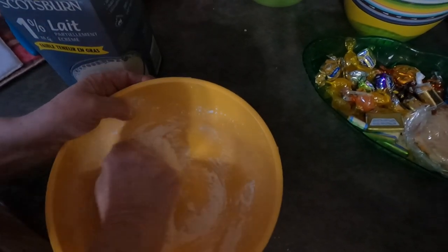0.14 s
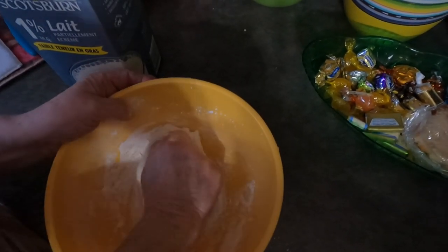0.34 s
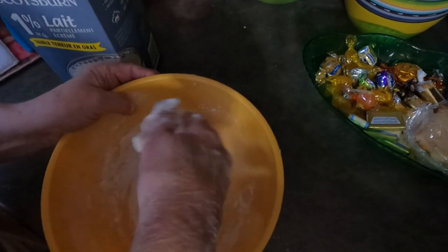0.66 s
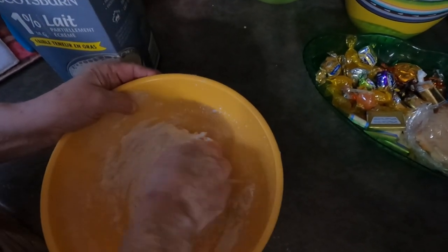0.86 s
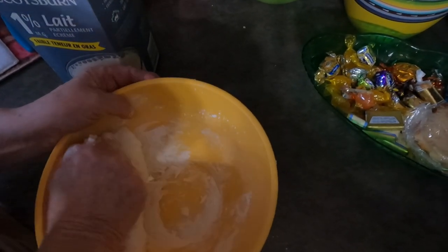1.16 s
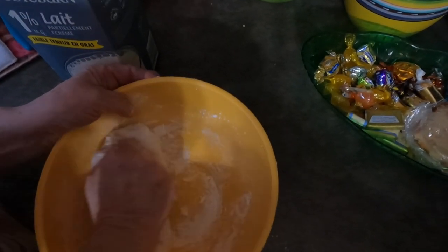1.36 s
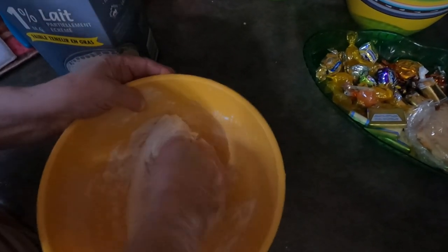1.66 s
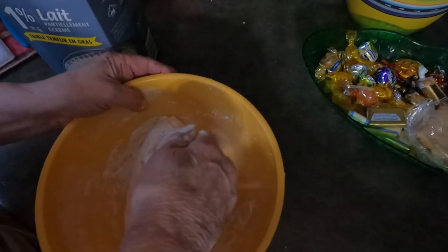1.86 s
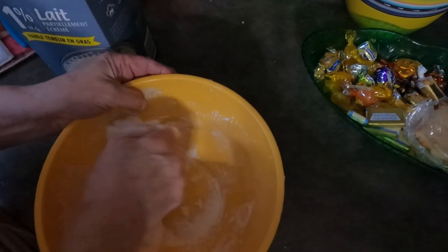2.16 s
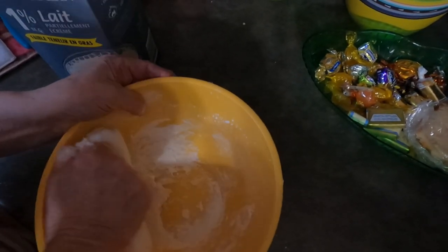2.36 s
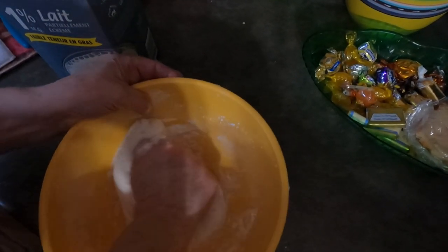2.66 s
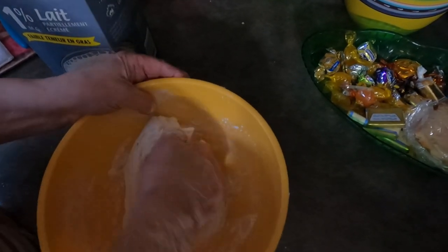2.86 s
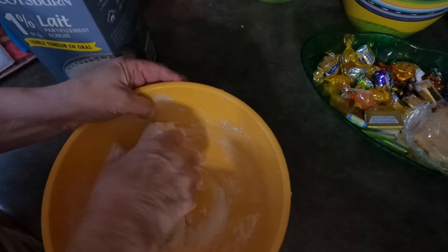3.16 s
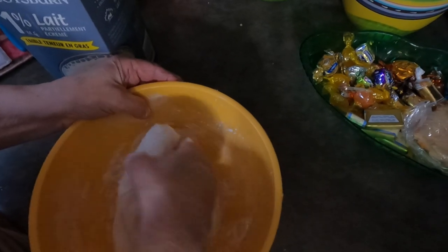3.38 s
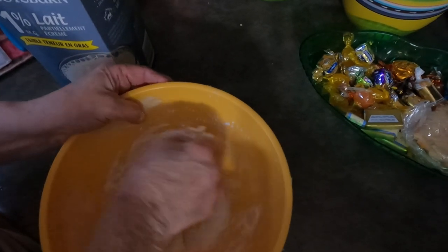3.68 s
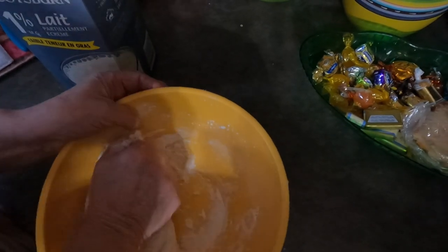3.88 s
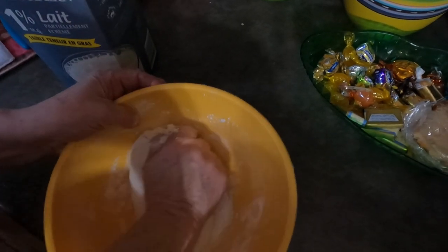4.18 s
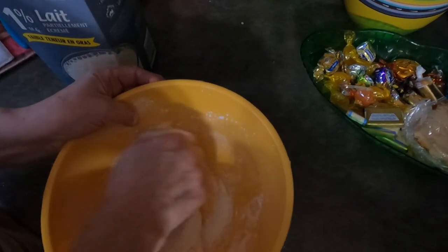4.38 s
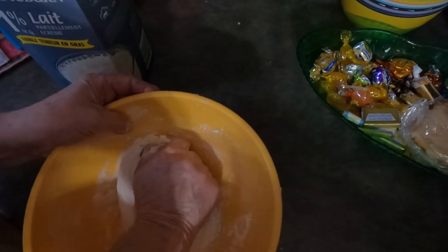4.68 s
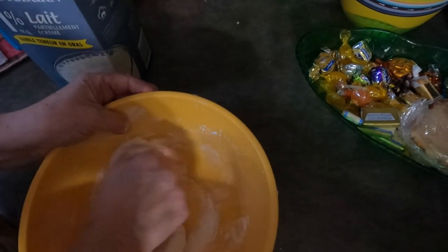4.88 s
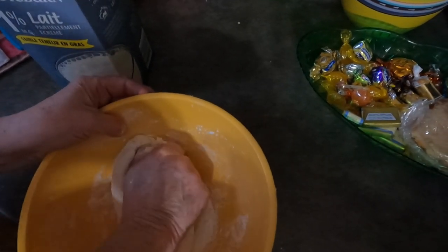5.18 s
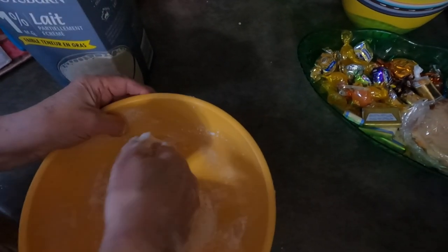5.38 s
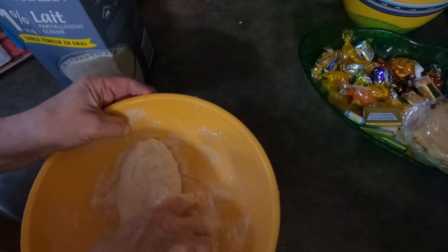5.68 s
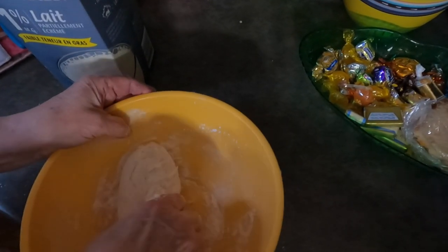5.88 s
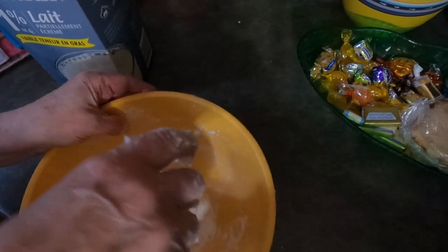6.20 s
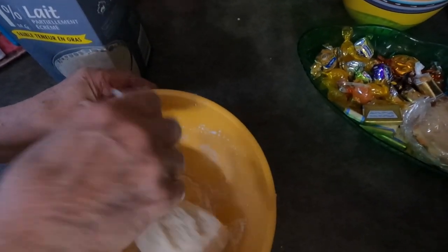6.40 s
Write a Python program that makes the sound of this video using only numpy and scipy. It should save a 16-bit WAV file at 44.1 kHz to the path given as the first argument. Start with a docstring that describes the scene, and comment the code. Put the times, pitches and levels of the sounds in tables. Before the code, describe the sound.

A hand kneads stiff dough in a plastic bowl on a kitchen counter, close to a small microphone. Soft rubbing and small taps open, then a firm hollow knock at 0.7 s with a dull thud just behind it. A lighter knock follows near 1.3 s, a little scuffing, then a sharper clack at 1.8 s. Moderate knocks come at 2.1 and 2.3 s, then a lull of gentle rubbing until a hard knock at 3.0 s and low grinding after it. Strong knocks continue at 3.6, 4.0, 4.6, 5.0 and 5.5 s, with dry strokes swelling between. From 5.8 s it gets busier: a loud clack with a bright scuff, then clustered thumps and scrapes at 6.2 to 6.4 s, fading into rubbing. The ring is short and damped, the room small, the background faint and steady.

```python
"""A plastic bowl knocks on a kitchen counter as a hand works stiff dough round it, near a small microphone.
Each knock cracks and rings the wall's modes; the weight lands a moment later as a dull counter thud.
Dough and skin slide on the floury wall: filtered friction noise hisses and drives bowl and counter modes.
Brief scuffs are bursts of noise about a bright centre; a short room tail and quiet kitchen air surround all."""
import sys
import numpy as np
from scipy import signal
from scipy.fft import rfft, irfft, next_fast_len
from scipy.io import wavfile
from scipy.ndimage import uniform_filter1d

SR = 44100
rng = np.random.default_rng(int(sys.argv[2]) if len(sys.argv) > 2 else 0)


def dump(signal):
    """Clip the signal to [-1, 1] and save it as 16-bit WAV at the path in sys.argv[1]."""
    limited = np.clip(np.atleast_2d(signal).T, -1, 1)
    pcm = np.round(limited * 32767).astype(np.int16)
    wavfile.write(sys.argv[1], SR, pcm)


def level_to_linear(level):
    """Convert decibel levels to linear amplitude factors, elementwise."""
    exponent = np.asarray(level, float) / 20
    return 10 ** exponent


N = 288614

# Modes of the bowl wall. Each row: frequency in Hz, relative level in dB, time to decay 60 dB in seconds.
BOWL_MODES = [(344.7, -8.5, 0.14), (477.4, 2, 0.056), (544.5, 2, 0.062), (600, -10.5, 0.13),
              (699, 7.5, 0.035), (801, -2, 0.05), (826, -4.5, 0.09), (1146, 4, 0.04), (1298, -1.5, 0.041),
              (1430, -3.5, 0.039), (1730, -7, 0.028)]
# Modes of bowl and counter moving together. Each row: frequency in Hz, relative level in dB,
# time to decay 60 dB in seconds.
COUNTER_MODES = [(92.6, -22, 0.05), (177, 6.5, 0.075), (251, -9, 0.1), (282.7, 5.5, 0.057),
                 (396.6, -3, 0.098), (484, -13.5, 0.027)]
# Weight resting on the counter. Each row: time in seconds, hum in dB before its tone balance,
# counter tone in dB (higher favours the upper modes).
WEIGHT = [(0, -52, 2), (.18, -58, -4), (.3, -45, -12), (.48, -58, 0), (.6, -48, 4), (.9, -54, -4),
          (1.1, -59, -10), (1.4, -50, -9), (1.546, -39, -8), (1.68, -54, 0), (2.05, -56, 4),
          (2.55, -48, -2), (2.784, -38, -10), (2.94, -66, 2), (3.1, -54, 10), (3.35, -50, 0), (3.6, -62, 0),
          (3.72, -48, 6), (4.2, -45, -7), (4.3, -41, -2), (4.48, -62, -1), (4.734, -40, -5),
          (4.97, -55, -4), (5.08, -41, 2), (5.35, -52, 0), (5.47, -42, -4), (5.63, -43, 6), (5.7, -59, 3),
          (5.9, -42, 15), (5.98, -51, 20), (6.046, -41.5, 17), (6.12, -56, 8), (6.3, -44, 9),
          (6.43, -52, 10), (6.48, -41, 20), (6.54, -48, 10)]


def unit_rms(x):
    """Scale a sound to an rms of 1."""
    return x / np.sqrt(np.mean(x ** 2))


def colour(x, points):
    """Shape a sound's spectrum by (Hz, dB) points, drawn over log frequency; rms 1."""
    hz, db = np.transpose(points)
    size = next_fast_len(len(x))
    f = np.maximum(np.arange(size // 2 + 1) * SR / size, 1)
    gain = level_to_linear(np.interp(np.log(f), np.log(hz), db))
    return unit_rms(irfft(rfft(x, size) * gain, size)[:len(x)])


def ring(modes, scatter_db=0., tilt_db=0., about_hz=700., detune=0., rise_ms=0.41):
    """Answer of a set of modes to a tap: decaying sines with stepped phases that take a moment to build."""
    hz, db, t60 = np.transpose(modes)[:, :, None]
    t = np.arange(SR // 4) / SR
    gain = level_to_linear(db + scatter_db + tilt_db * np.log2(hz / about_hz))  # tilt in dB per octave
    lag = 0.75 * np.arange(len(hz))[:, None]  # radians
    # the second term cancels the jump at the start
    swing = np.sin(2 * np.pi * hz * (1 + detune) * t - lag) + np.sin(lag) * np.exp(-t * hz * 3)
    decay = np.exp(-np.log(1000) * t / t60)
    build = 1 - np.exp(-1000 * t / rise_ms)
    return build * np.sum(gain * decay * swing, axis=0)


def walk(rate):
    """Random levels held 1 / rate s and smoothed twice over that time; spread near 1."""
    k = int(SR / rate)
    held = np.repeat(rng.standard_normal(N // k + 1), k)
    return 1.25 * uniform_filter1d(uniform_filter1d(held, k), k)[:N]


def grit(flicker_db, rate):
    """Friction force: noise whose level wanders as the grip catches and slips."""
    return rng.standard_normal(N) * level_to_linear(flicker_db * walk(rate))


def follow(table):
    """Columns of a table as curves over time."""
    s, *columns = np.transpose(table)
    return (np.interp(np.arange(N) / SR, s, c) for c in columns)


def swell(s, db, rise_s, fade_s):
    """Summed power of sounds that swell to a round peak at s and fade; times are for 20 dB."""
    t = np.arange(0, N + 64, 64) / SR
    s, db, rise_s, fade_s = (np.reshape(column, (-1, 1)) for column in (s, db, rise_s, fade_s))
    late = t - s
    slope = np.where(late < 0, -late / rise_s, late / fade_s)
    power = level_to_linear(db - 20 * slope ** 1.5) ** 2  # an exponent above 1 rounds the top
    return np.interp(np.arange(N) / SR, t, np.sum(power, axis=0))


def effort():
    """Gains of hiss, edge, flour, wall and counter: strokes slide and press, the foot grinds, weight rests."""
    # Strokes of dough along the wall. Each row: peak time in seconds, rubbing hiss in dB,
    # seconds to swell 20 dB, seconds to fade 20 dB, bright edge over the hiss in dB.
    strokes = [(0.137, -48.8, 0.13, 0.28, -10.6), (0.327, -46.1, 0.21, 0.17, -6.6),
               (0.586, -49.9, 0.12, 0.25, -4.6), (0.738, -44.9, 0.07, 0.07, -13.6),
               (1.013, -50.7, 0.07, 0.18, -6.5), (1.13, -49.5, 0.07, 0.22, -9),
               (1.27, -47, 0.03, 0.05, -14), (1.41, -50, 0.25, 0.05, -8), (1.474, -45.0, 0.12, 0.33, -9.0),
               (1.658, -36, 0.1, 0.09, -11), (1.826, -44.7, 0.23, 0.14, -8.2),
               (2.174, -44.3, 0.03, 0.04, -4.4), (2.257, -45.8, 0.11, 0.12, -5.8),
               (2.407, -46.7, 0.13, 0.14, -11.0), (2.473, -51.5, 0.04, 0.87, -6.0),
               (2.845, -42.7, 0.44, 0.07, -11.4), (2.95, -46.0, 0.06, 0.28, -10.7),
               (3.49, -49.2, 0.12, 0.14, -10.6), (3.682, -49.0, 0.13, 0.04, -5.6),
               (3.856, -43, 0.18, 0.11, -11), (3.957, -40.3, 0.06, 0.11, -12.0),
               (4.134, -48.5, 0.08, 0.19, -7.2), (4.315, -37, 0.04, 0.09, -11), (4.35, -46, 0.1, 0.03, -7),
               (4.424, -42.8, 0.09, 0.06, -8.3), (4.63, -43, 0.13, 0.09, -9),
               (4.763, -52.9, 0.08, 0.09, -4.6), (4.926, -46.8, 0.04, 0.09, -5.1),
               (5.04, -52, 0.03, 0.15, -9), (5.115, -47, 0.05, 0.25, -8.5), (5.37, -47.2, 0.05, 0.28, -8.8),
               (5.515, -46, 0.03, 0.12, -12), (5.908, -39.5, 0.13, 0.05, -13.3),
               (6.031, -45.4, 0.11, 0.32, -9.1), (6.17, -35, 0.045, 0.05, -20),
               (6.335, -48.2, 0.28, 0.23, -17.0), (6.446, -51.3, 0.04, 0.05, -8.0),
               (6.57, -59.9, 0.13, 0.03, 5.8)]
    # The loaded bowl grinds on its foot, mostly just after a knock. Each row: peak time in seconds,
    # wall hum in dB, seconds to swell 20 dB, seconds to fade 20 dB.
    grinds = [(0.14, -51, 0.03, 0.26), (0.324, -44.7, 0.07, 0.2), (0.711, -39.9, 0.22, 0.12),
              (1.154, -48.2, 0.07, 0.06), (1.28, -44, 0.04, 0.08), (1.678, -38.9, 0.21, 0.11),
              (1.88, -45, 0.2, 0.12), (2.199, -48.3, 0.09, 0.05), (2.494, -52.0, 0.09, 0.04),
              (2.83, -43.5, 0.31, 0.13), (3.1, -36, 0.06, 0.19), (3.18, -38.5, 0.1, 0.04),
              (3.355, -47.1, 0.05, 0.04), (3.68, -38, 0.05, 0.4), (4.03, -50, 0.05, 0.5),
              (4.322, -39.4, 0.06, 0.09), (4.69, -41, 0.05, 0.2), (4.93, -43, 0.02, 0.06),
              (5.1, -36, 0.08, 0.18), (5.384, -47.0, 0.05, 0.1), (5.565, -40.1, 0.13, 0.13),
              (5.912, -40.4, 0.15, 0.25), (6.195, -33, 0.05, 0.05), (6.32, -34, 0.04, 0.18),
              (6.385, -37, 0.1, 0.08)]
    rest_db, rest_edge_db = -72, -77.5  # hand lying still
    drag_db = -10  # wall hum over the hiss
    stroke_push_db, grind_push_db = -11, -9  # counter hum over the hiss, and over a grind's wall hum

    s, db, rise_s, fade_s, edge_db = np.transpose(strokes)
    rub = swell(s, db, rise_s, fade_s) + level_to_linear(rest_db) ** 2
    edge = swell(s, db + edge_db, rise_s, fade_s) + level_to_linear(rest_edge_db) ** 2
    # flour hiss is -71.5 dB at an edge of -57 dB and moves 1.25 dB per dB of the edge
    flour = level_to_linear(-71.5 + 1.25 * (10 * np.log10(edge) + 57))
    grind = swell(*np.transpose(grinds))
    drag = level_to_linear(drag_db) ** 2 * rub + grind
    weight_db, tone_db = follow(WEIGHT)
    load = level_to_linear(weight_db) ** 2 + level_to_linear(stroke_push_db) ** 2 * rub + level_to_linear(grind_push_db) ** 2 * grind
    return np.sqrt(rub), np.sqrt(edge), flour, np.sqrt(drag), np.sqrt(load), tone_db


def patchy(x, patch_db, rate):
    """The contact patch wanders over the wall, so each third-octave swells and fades on its own."""
    edges = 700 * 2 ** np.arange(0, 3.7, 1 / 3)  # Hz
    out = np.zeros(N)
    for k, (lo, hi) in enumerate(zip(edges, edges[1:])):
        band = signal.sosfilt(signal.butter(2, [lo, hi], "band", fs=SR, output="sos"), x)
        gain = level_to_linear(patch_db * walk(rate) - patch_db ** 2 / 8)
        out += (-1) ** k * gain * band  # neighbouring bands have opposite sign
    return out


def rubbing():
    """Sliding dough hisses; its drag sets the wall and the counter humming."""
    # Spectra of the rubbing hiss, its bright edge and the fine flour.
    # Each row: frequency in Hz, relative density in dB per Hz.
    rub_spectrum = [(530, -13.5), (900, -6), (1010, -12.5), (1110, -9.5), (1310, -8.5), (1410, -6.5),
                    (1580, -9.5), (1860, -8.5), (2010, -6), (2770, -3.5), (4000, -20), (5200, -65.5),
                    (8800, -120)]
    edge_spectrum = [(2120, -58), (3600, -1), (4530, 0), (7070, -10.5), (9000, -27), (11700, -37),
                     (19800, -120)]
    flour_spectrum = [(5410, -68), (9200, -11.5), (9790, -8), (10400, -6.5), (10800, -5.5), (11500, -17),
                      (13000, -26), (15800, -60), (22000, -120)]
    rub, edge, flour, drag, load, tone_db = effort()

    grip = grit(1.98, 60) * level_to_linear(1.5 * walk(300))
    slide = rub * colour(grip, rub_spectrum) + edge * colour(grip, edge_spectrum)
    hiss = patchy(slide, 2.2, rate=18) + flour * colour(grip, flour_spectrum)

    wall = unit_rms(signal.fftconvolve(grit(3.76, 30), ring(BOWL_MODES, tilt_db=-5.0))[:N])
    # pressing near the rim favours the higher counter modes
    deep = unit_rms(signal.fftconvolve(grit(1.65, 25), ring(COUNTER_MODES[:2]))[:N])
    high = unit_rms(signal.fftconvolve(grit(1.65, 25), ring(COUNTER_MODES[2:]))[:N])
    counter = level_to_linear(-tone_db / 2 - 4.5) * deep + level_to_linear(tone_db / 2 - 3.5) * high
    return hiss + drag * wall + load * counter


def kitchen_air():
    """Steady quiet background of the kitchen: coloured noise."""
    # Spectrum of the air. Each row: frequency in Hz, relative density in dB per Hz.
    air_spectrum = [(25, 4), (100, -9), (180, -14), (270, 3), (450, -11), (1200, -7), (3500, -34),
                    (9000, -50), (12000, -65)]
    return level_to_linear(-56.5) * colour(rng.standard_normal(N), air_spectrum)


def add(out, s, x, db):
    """Mix x in at time s with the given peak."""
    i = int(s * SR)
    out[i:i + len(x)] += (x * level_to_linear(db) / np.max(np.abs(x)))[:len(out) - i]


def push(ms):
    """Force of a contact lasting ms: one raised-cosine bump."""
    return np.hanning(max(int(ms * SR / 1000), 1) + 2)


def knocks():
    """The foot strikes, cracks and rings the wall; the weight lands after it and the counter thuds."""
    # Knocks of the bowl. Each row: start in seconds, wall ring peak in dB, crack peak in dB,
    # wall tone in dB per octave, settling thud peak in dB.
    blows = [(.104, -29, -40, -12, -29.5), (.224, -45, -38, -13, -42), (.558, -38, -42, -8, -32.5),
             (.6711, -14, -21, -3, -21.5), (.962, -28.5, -35, 12, -34.5), (1.2555, -20, -32, 4, -24.5),
             (1.4612, -34.5, -22.5, -7, -36), (1.512, -31, -34, 6, -40), (1.572, -29, -46, 2, -33),
             (1.7832, -12, -12.5, -1.5, -18), (1.842, -16.5, -42, -6.5, -23.5), (2.1207, -20, -27, -3, -23),
             (2.2905, -19.5, -42, -10.5, -23.5), (2.446, -44, -57, -4, -25.5),
             (3.0399, -8.5, -9.5, -6.5, -13.5), (3.6378, -12, -19, 0, -16), (3.7279, -21.5, -48, -3, -25),
             (4.002, -15.5, -20.5, -7.5, -20), (4.265, -56, -45, 0, -34), (4.6404, -12.5, -15, -4, -17),
             (4.9164, -28, -36, 6.5, -36.5), (5.0259, -8.5, -11, -5, -15.5), (5.5004, -12, -13, 0, -16.5),
             (5.7819, -28.5, -36, -2, -34), (5.8265, -11.5, -30, 7.5, -32), (5.8322, -8, -11, -6, -10.5),
             (6.1853, -16.5, -40.5, -2, -18), (6.2883, -12, -10, -3, -11), (6.3005, -12, -34, -26, -36),
             (6.4045, -24, -45, -8, -24)]
    # Spectrum of the crack. Each row: frequency in Hz, relative density in dB per Hz.
    crack_spectrum = [(800, 6), (1500, -3), (2300, 3), (3200, -11), (5000, -22), (8000, -50), (10500, -54),
                      (15000, -85)]
    settle_s = 0.0105  # from strike to thud
    scatter_db, detune = 2.5, 0.012  # spread of mode levels and of relative mode frequencies

    out, t = np.zeros(N), np.arange(SR // 10) / SR
    # the crack opens in 0.6 ms, then dies away fast with a weaker, slower tail
    onset = np.sin(np.pi / 2 * np.minimum(t / 0.0006, 1)) ** 2
    snap = onset * (np.exp(-t / 0.0013) + 0.3 * np.exp(-t / 0.011))
    for s, wall_peak_db, crack_db, wall_tilt_db, thud_db in blows:
        # hand and dough load the wall a little differently at every blow
        level_draw, pitch_draw = rng.standard_normal((2, len(BOWL_MODES), 1))
        wall = ring(BOWL_MODES, scatter_db * level_draw, wall_tilt_db, detune=detune * pitch_draw, rise_ms=1.3)
        add(out, s, np.convolve(wall, push(0.3)), wall_peak_db)

        add(out, s, snap * colour(rng.standard_normal(len(t)), crack_spectrum), crack_db)

        weight_s, _, weight_tone_db = np.transpose(WEIGHT)
        thud_tilt_db = -4 + 0.75 * np.interp(s, weight_s, weight_tone_db)
        thud = ring(COUNTER_MODES, tilt_db=thud_tilt_db, about_hz=220., rise_ms=6.)
        add(out, s + settle_s, np.convolve(thud, push(1.13)), thud_db)
    return out


def scuffs():
    """Short bursts of friction, each about its own bright centre: they build, crackle and let go."""
    # Quick scuffs of knuckle or dough on the wall. Each row: start in seconds, level in dB before
    # the envelope, centre in Hz, hold in ms, time to fade 20 dB in ms.
    bursts = [(0.951, -34.5, 2270, 19, 9.9), (1.276, -44, 2670, 8, 8), (1.409, -44, 2000, 1.5, 5.5),
              (1.457, -42, 1430, 6.8, 39), (2.1305, -28.5, 1660, 7, 15), (2.168, -44, 2420, 5, 8),
              (3.167, -46, 1730, 4.5, 17), (3.339, -38, 2480, 8, 10), (3.618, -43, 1720, 1.5, 3.3),
              (4.288, -41.5, 2240, 42, 11), (5.381, -40, 3500, 1.5, 7.1), (5.779, -33, 2580, 1.5, 34),
              (5.827, -26.5, 2470, 5, 12), (6.144, -40, 2440, 39, 13), (6.171, -30.5, 2320, 17, 12),
              (6.288, -26.5, 2260, 6, 16.5), (6.44, -47.5, 2280, 8.2, 11)]
    out, ms = np.zeros(N), np.arange(SR // 5) / SR * 1000
    for s, db, hz, hold_ms, fade_ms in bursts:
        # the grip changes every millisecond
        grip = level_to_linear(2.5 * rng.standard_normal(200))[ms.astype(int)]
        centre = [(.6 * hz, -16), (.86 * hz, -9), (hz, 0), (1.16 * hz, -9), (1.7 * hz, -17)]
        spectrum = [(200, -24), *centre, (8000, -32), (10500, -39), (15000, -70)]
        tone = colour(rng.standard_normal(len(ms)) * grip, spectrum)
        rise_ms = min(0.8 * hold_ms, 6.5)
        fade = level_to_linear(-20 * np.maximum(ms - rise_ms - hold_ms, 0) / fade_ms)
        shape = np.minimum(ms / rise_ms, 1) ** 2 * fade
        i = int(s * SR)
        out[i:i + len(ms)] += (level_to_linear(db) * shape * tone)[:N - i]
    return out


def room(x):
    """Short diffuse tail of the kitchen walls: decaying noise after a 4 ms gap."""
    t60_s, level_db = 0.31, -13.5
    t = np.arange(SR // 2) / SR
    noise = colour(rng.standard_normal(len(t)), [(100, 4.5), (2000, -13.5), (10000, -0.5)])
    tail = noise * np.exp(-np.log(1000) * t / t60_s) * (t > .004)
    tail = tail / np.sqrt(np.sum(tail ** 2))
    return level_to_linear(level_db) * signal.fftconvolve(x, tail)[:N]


def scene():
    """Everything reaches both channels alike."""
    bowl = rubbing() + knocks() + scuffs()
    return np.tile(bowl + room(bowl) + kitchen_air(), (2, 1))


def roll_off(x):
    """The treble ends steeply here."""
    return signal.sosfilt(signal.butter(12, 15400, fs=SR, output="sos"), x)


def record(dry):
    """The capsule drops deep bass and the housing notches the treble; faint steady high noise,
    independent in left and right, is mixed in."""
    notch_hz, notch_width_hz, low_cut_hz, high_noise_db = 9050, 700, 120, -89
    x = signal.lfilter(*signal.iirnotch(notch_hz, notch_hz / notch_width_hz, SR), dry)
    x = signal.sosfilt(signal.butter(3, low_cut_hz, "high", fs=SR, output="sos"), x)
    noise_spectrum = [(6000, -24), (10000, -9), (12000, 5), (14000, -5), (15500, -21), (22000, -90)]
    high_noise = np.array([colour(rng.standard_normal(N), noise_spectrum) for _ in range(2)])
    mix = x + level_to_linear(high_noise_db) * high_noise
    return roll_off(mix)


dry = scene()
out = record(dry)
dump(out)
```